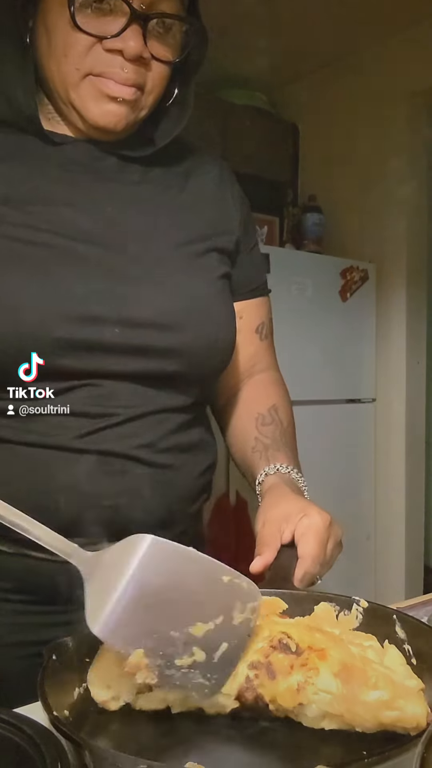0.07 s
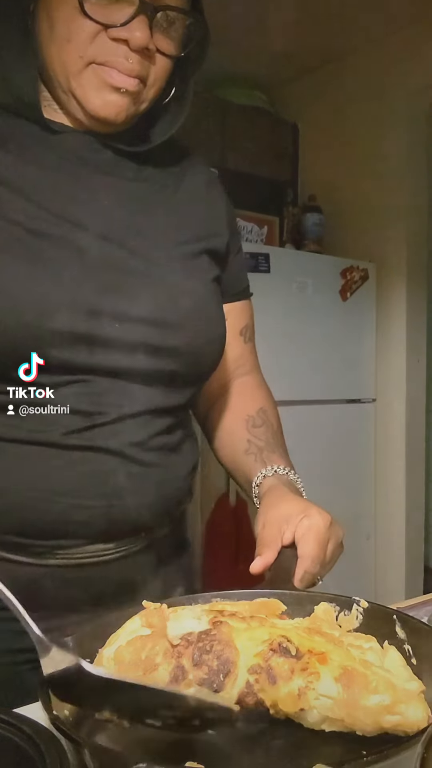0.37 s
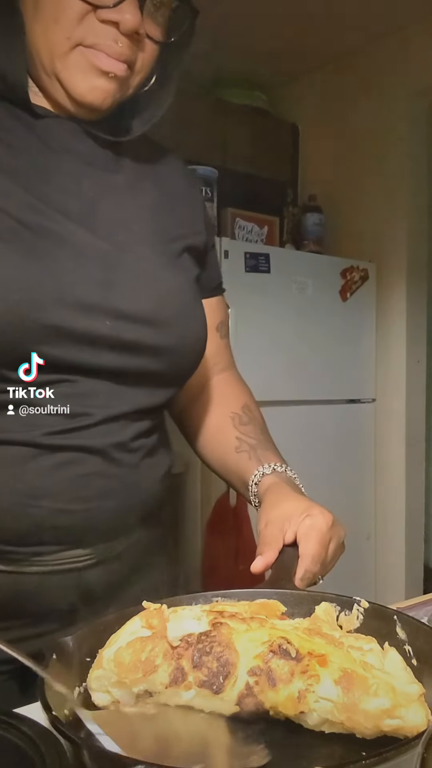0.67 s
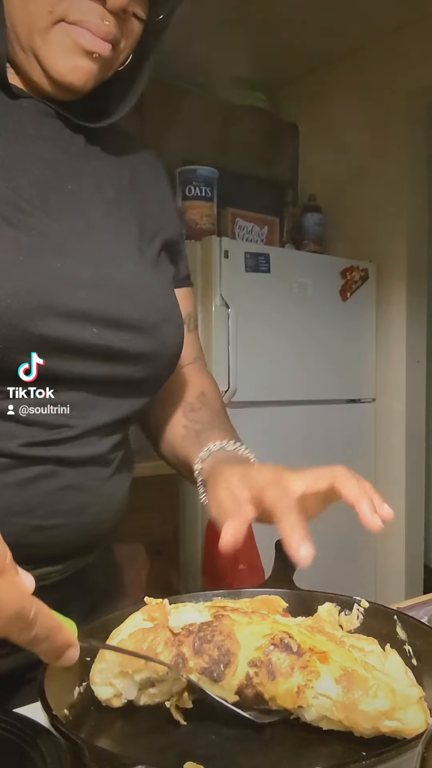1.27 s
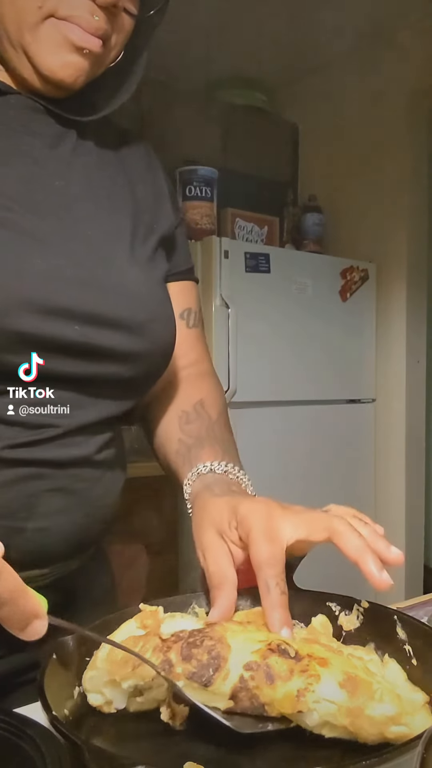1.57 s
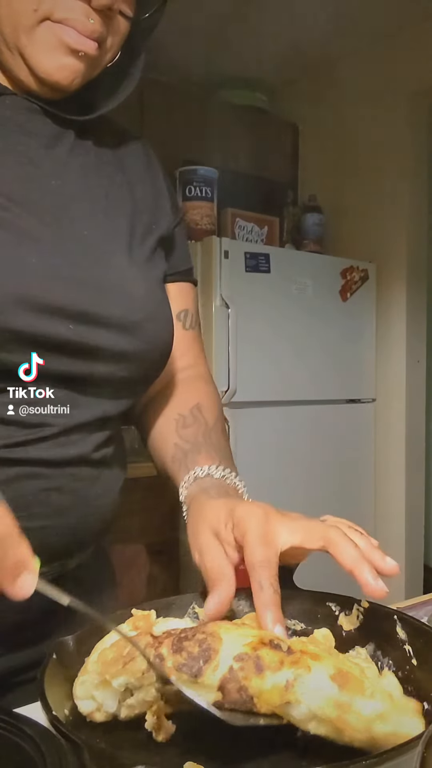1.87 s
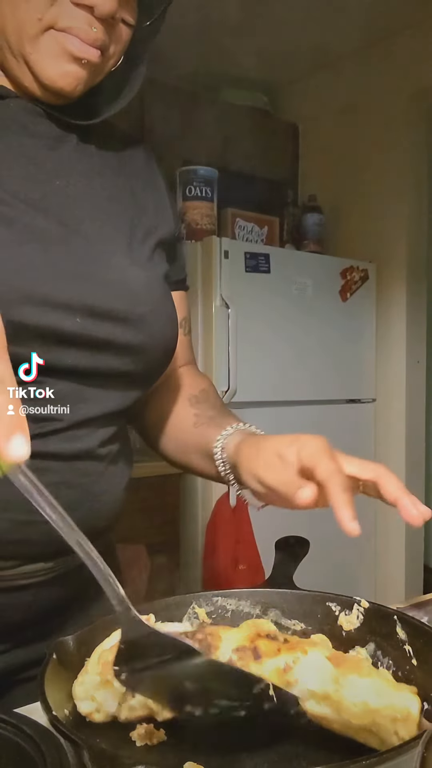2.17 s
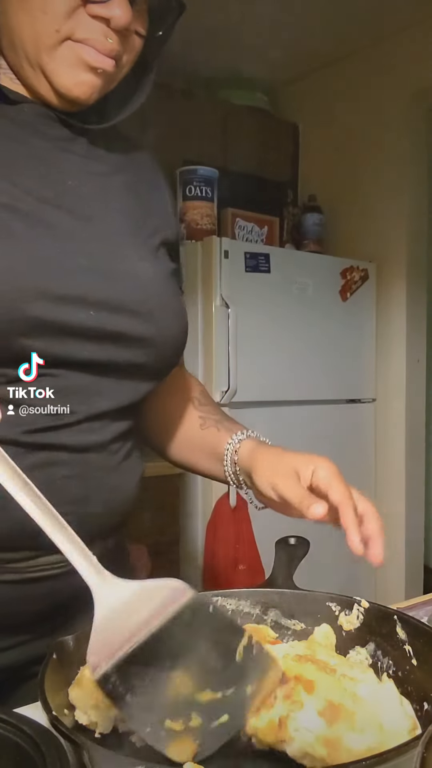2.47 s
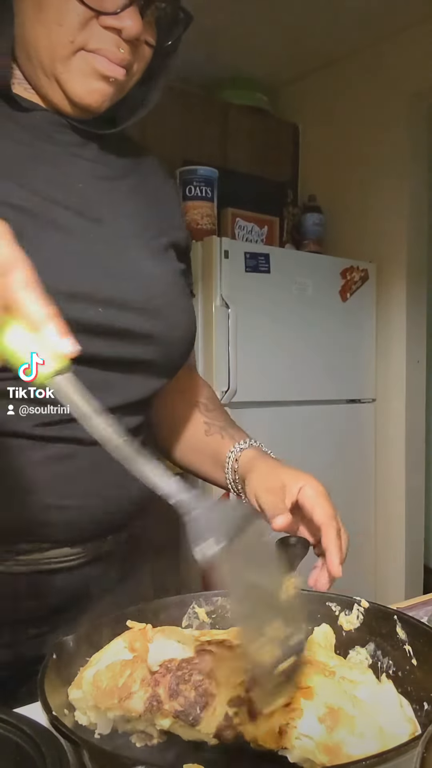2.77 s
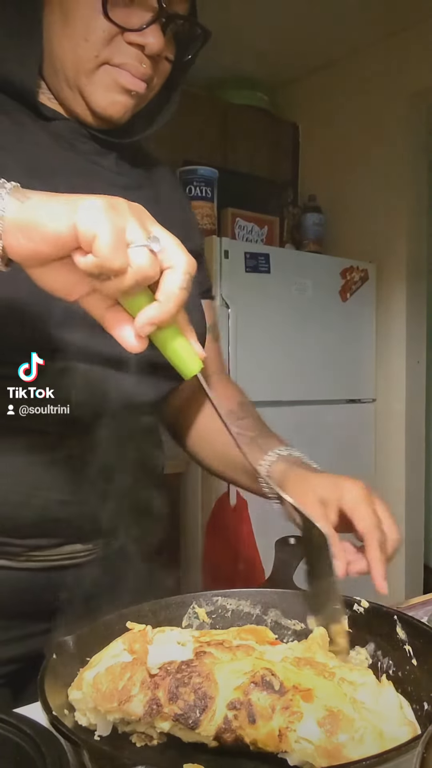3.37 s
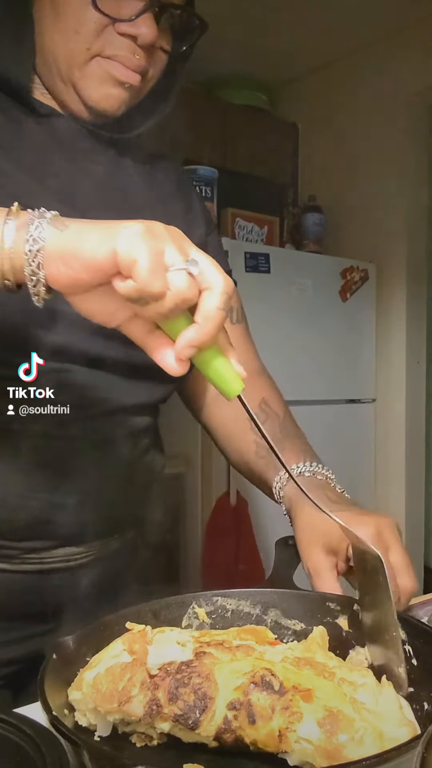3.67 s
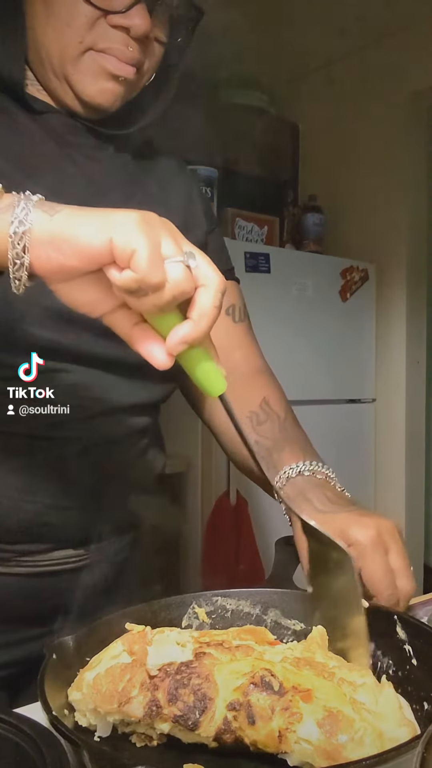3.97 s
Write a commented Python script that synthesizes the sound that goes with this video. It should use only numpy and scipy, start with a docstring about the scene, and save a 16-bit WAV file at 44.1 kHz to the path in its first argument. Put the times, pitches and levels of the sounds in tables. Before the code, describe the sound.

An omelette sizzles close by, with small spits of fat over a faint kitchen hum. A steel spatula knocks on the pan at about 0.4 seconds, then slides under the egg near 0.7 and 2 seconds with light taps, the hiss swelling each time. At 3.1 seconds it clanks and scrapes along the rim, ringing briefly, and it strikes the pan again near 3.9 seconds.

```python
"""An omelette sizzles in a frying pan, close by: steam bubbles burst in the fat, larger pockets spit.
A small kitchen rumbles and hums underneath. A steel spatula knocks on the pan, slides under the egg
twice (the fat hisses up), then clanks and scrapes along the rim with its blade ringing freely.
Each contact is stick-slip noise through the pan's resonances plus the ringing modes of the steel."""
import sys
import numpy as np
from scipy import signal
from scipy.fft import rfft, irfft
from scipy.io import wavfile
from scipy.ndimage import uniform_filter1d

SR = 44100
rng = np.random.default_rng(int(sys.argv[2]) if len(sys.argv) > 2 else 0)


def to_wav(sig):
    """Store sig (one row per channel, or 1-D mono) as 16-bit WAV at the path in sys.argv[1].

    Samples outside -1..1 are clipped; the rate is SR.
    """
    pcm = np.clip(np.atleast_2d(sig), -1, 1) * 32767
    pcm = np.round(pcm).astype(np.int16)
    wavfile.write(sys.argv[1], SR, pcm.T)  # frames by channels


N = 176400

# frying loudness: t/s, level/dB
SIZZLE_LEVEL = [(0, -67), (.25, -68), (.68, -64), (.8, -54), (.95, -53.5), (1.08, -55), (1.25, -59.5),
                (1.4, -66), (1.55, -62.5), (1.75, -58), (1.9, -60), (2.0, -62.5), (2.1, -55), (2.45, -53),
                (2.8, -55), (3.1, -58), (3.65, -61), (4, -65)]
# frying spectrum: f/Hz, relative level/dB
SIZZLE_SPECTRUM = [(250, -22), (600, -18), (950, -2.5), (1300, -13.5), (1900, -1), (3000, -0.5), (4300, 2),
                   (6300, 1.5), (8000, -3), (12000, -3.5), (15500, -6.5)]
# appliance rumble: f/Hz, relative level/dB
RUMBLE_SPECTRUM = [(20, -27), (42, -33.5), (56, -4), (85, -17), (115, -4), (150, -6), (195, 1), (260, -8),
                   (370, -7.5), (520, -16.5), (700, -20), (1000, -20.5), (1400, -27.5), (6000, -50.5)]
# mains hum: f/Hz, level/dB
HUM_LINES = [(59.5, -71.5), (119, -78), (238, -65.5)]
# spits of fat: t/s, gain/dB, centre f/Hz, hold/s
SPIT_EVENTS = [(0.259, -58, 7000, .004), (0.319, -62, 5870, 0.0045), (0.508, -61, 4600, 0.0053),
               (1.275, -60, 7000, .005), (1.304, -56, 5760, 0.0078), (1.582, -47.5, 11900, 0.0034),
               (2.325, -69, 3480, .006), (2.663, -57, 6000, .006), (2.847, -58, 6000, .008),
               (2.898, -53, 4460, 0.011), (2.924, -48.5, 4840, 0.017), (3.035, -59.5, 5500, .004),
               (3.477, -59, 5970, 0.0043), (3.531, -43, 4600, 0.0037), (3.547, -49, 5660, 0.0059),
               (3.661, -52, 4800, 0.0043), (3.736, -51.5, 6460, .005), (3.762, -52, 3960, 0.0026),
               (3.809, -52.5, 3600, 0.0068)]
# edge on rim, tip into base, flat on base, edge along rim, flat under egg
CONTACT_KINDS = ("clank", "jab", "slap", "scrape", "slide")
CONTACT_BANDS_HZ = (220, 700, 3200, 12000)
# spatula blows: kind, t/s, rise/s, hold/s, t60/s, gain/dB at each of CONTACT_BANDS_HZ,
# ring gain/dB, share of free ring time, left-right/dB
SPATULA_BLOWS = [("slap", .404, .004, 0.01, 0.21, -42.5, -37.5, -49.5, -71, 3.2, 0.37, 3.5),
                 ("slap", .504, 0.0037, .008, .1, -53, -50, -56.5, -66, -8, .4, 4),
                 ("slide", .746, 0.0092, 0.0079, 0.11, -54, -54.5, -64.5, -72, 3, 0.26, 2),
                 ("slap", 1.046, .008, 0.0089, 0.072, -56, -53, -57, -51, -12, 0.27, 1),
                 ("slap", 1.135, 0.0061, 0.0079, 0.092, -46, -47, -59, -66, -13.5, 0.22, 1),
                 ("slap", 1.226, .004, 0.0073, 0.31, -61, -52.5, -56, -74, -9.5, 0.43, 1),
                 ("slap", 1.855, 0.0022, 0.016, .07, -37, -47, -61.5, -57, -16, 0.38, 1),
                 ("clank", 3.105, 0.0069, 0.0029, 0.19, -33, -37, -27.5, -31, 2.3, 0.6, 4.2),
                 ("jab", 3.867, 0.01, 0.0092, 0.19, -31, -32.5, -22.5, -34, -5.5, 0.49, -1.1)]
# spatula drags: columns as SPATULA_BLOWS
SPATULA_DRAGS = [("slide", 0.441, 0.018, .04, 0.14, -36.5, -41.5, -55.5, -66.5, -11, 0.34, 3.2),
                 ("slide", 0.656, 0.091, .14, 0.45, -51, -47, -60.5, -63, -5, 0.73, 2.2),
                 ("scrape", 1.46, 0.034, .01, .12, -33, -54, -47.5, -58.5, -21, .3, 6),
                 ("slide", 1.963, 0.093, 0.23, 0.49, -46, -44.5, -58, -70, -7.5, 0.72, 1.1),
                 ("slide", 2.15, 0.0964, 0.0051, 0.046, -49, -43.5, -51, -48.5, -5, 0.45, 4),
                 ("slide", 2.32, 0.036, 0.061, 0.17, -50, -50, -69, -67, -0.71, 0.81, 3.5),
                 ("scrape", 3.185, 0.055, 0.06, 0.22, -36, -42, -31.5, -44, 2, 1, 3.6),
                 ("scrape", 3.71, 0.013, 0.033, 0.24, -38.5, -61.5, -69.5, -79, -1.5, 0.59, 1),
                 ("jab", 3.89, 0.043, 0.084, 0.51, -33, -49, -41, -60, 0, 0.81, 0)]
# damped pan resonances: f/Hz, width/Hz, peak gain/dB
PAN_RESONANCES = [(530, 58, 9), (609, 70, 2), (937, 72, 8.5), (1046, 49, 12.5), (1540, 33, 6),
                  (1758, 39, 12), (1903, 35, 11.5), (2340, 16, 3), (2530, 89, 9), (2910, 83, 6.5),
                  (3390, 87, 5), (3800, 200, 3.5), (4186, 100, 7), (4570, 170, 10), (5240, 40, 7),
                  (6500, 280, 7)]
# ringing modes of blade and pan: f/Hz, gain/dB for each of CONTACT_KINDS,
# free t60/s, left-right/dB, left lead/rad
RING_MODES = [(146, -15, -13, -24, -20, -25, 0.97, 3, 0.37),
              (271.6, -11.5, -13, -14.5, -11, -22, .9, 8, -.1),
              (409.8, -14, -12, -2.5, -13.5, -25, 1.02, 7.5, -1.1),
              (524, -26, -2, -14, -41, 3.5, 0.37, 1.5, -0.47),
              (668, -32, -21.5, -20, -15, -18.5, 1.32, 6.5, 0.32),
              (1040, -4, -14, -9.5, -6, -5, .62, 12, 0.12),
              (1481, -11.5, -24, -8, -8, -18, 0.43, 12.5, -0.57),
              (1690, -19.5, -15, -13, 0, -18, 0.67, 14, -1.66),
              (1749, -7.5, -2.5, -12, -5, -8, 0.56, 0.5, 1),
              (1947, -21.5, -11.5, -22, -30, -10, 0.56, -2, 0.74),
              (2170, -37, -25.5, -19, -21, -23, 0.81, 23, 0.69),
              (2295, -31, -25, -8, -30, -31, 0.31, -2, -0.15),
              (2532, -17, -9.5, -10.5, -13, -28, 0.47, 10, -1.73),
              (2695, -10.5, -20, -22, -5, -20, 0.52, 1, -1.77),
              (3155, -12.5, -24, -11.5, -15.5, 0, 0.24, 9, 0.95),
              (3334, -12, -23, -20, -31, -25, 0.15, 8, -0.48),
              (3580, -24, -8.5, -29, -12.5, -20, 0.11, 12, -0.41),
              (4035, -19, -13, -34, -9.5, -16, 0.16, 6, 0.66),
              (4710, -10.5, -11, -22, -25, -20, 0.1, 10, 0),
              (6580, -17, -30, -19, -10.5, -13, 0.14, 9, 0.67)]

TOP_HZ = 15800
LN_1000 = np.log(1000)  # 60 dB
TIME_S = np.arange(N) / SR
SIDE_SIGN = np.array([[1], [-1]])


def amp(db):
    """Decibels to gain."""
    return 10 ** (np.asarray(db) / 20)


def unit_rms(x):
    """Scale to rms 1."""
    return x / np.sqrt(np.mean(x ** 2))


def spectrum_db(hz, points):
    """Interpolate (f/Hz, level/dB) points over log frequency."""
    points_hz, points_db = np.array(points, float).T
    return np.interp(np.log(hz + 1), np.log(points_hz), points_db)


def shape(x, gain, size=4096):
    """Minimum-phase filter with magnitude gain(f/Hz)."""
    cepstrum = irfft(np.log(gain(np.fft.rfftfreq(size, 1 / SR)) + 1e-7))
    cepstrum[1:size // 2] *= 2
    cepstrum[size // 2 + 1:] = 0
    impulse = irfft(np.exp(rfft(cepstrum)))
    return signal.oaconvolve(x, impulse[None], axes=-1)[:, :x.shape[1]]


def waver(rate_hz):
    """Smooth random motion, spread near 1."""
    step = int(SR / rate_hz)
    return uniform_filter1d(np.repeat(rng.standard_normal(N // step + 1), step), step)[:N]


def grains(per_s, spread_db, alike_below_hz=490):
    """Dense uneven stereo clicks: alike in the bass, unrelated in the treble."""
    fires = rng.random(N) < per_s / SR
    size = fires * amp(spread_db * np.minimum(rng.exponential(size=N), 5))
    mid, side = (unit_rms(size * rng.standard_normal((1, N))) for _ in range(2))
    coherence = lambda f: .9 / (1 + (f / alike_below_hz) ** 2)
    mid = shape(mid, lambda f: np.sqrt(1 + coherence(f)))
    side = shape(side, lambda f: np.sqrt(1 - coherence(f)))
    return (mid + side * SIDE_SIGN) / np.sqrt(2)


def balance(left_right_db):
    """Left and right gains."""
    return amp(SIDE_SIGN * left_right_db / 2)


def envelope(start_s, rise_s, hold_s, t60_s):
    """Quadratic rise, hold, exponential release."""
    age_s = TIME_S - start_s
    release_s = np.maximum(age_s - rise_s - hold_s, 0)
    return np.clip(age_s / rise_s, 0, 1) ** 2 * np.exp(-LN_1000 * release_s / t60_s)


def room(x, wet_db, low_t60_s=0.43, treble_t60_s=0.11):
    """Add reflections off hob and walls; treble dies first."""
    t = np.arange(SR // 2) / SR
    noise = rng.standard_normal((2, len(t)))
    low = signal.sosfilt(signal.butter(2, 3000, fs=SR, output="sos"), noise)
    tail = low * np.exp(-LN_1000 * t / low_t60_s) + (noise - low) * np.exp(-LN_1000 * t / treble_t60_s)
    return x + amp(wet_db) * signal.fftconvolve(x, unit_rms(tail) / np.sqrt(len(t)), axes=-1)[:, :N]


def sizzle():
    """Tiny steam bubbles burst in the fat, louder where wet egg meets hot metal."""
    bubbles = grains(per_s=7000, spread_db=2.5)
    hiss = shape(bubbles, lambda f: amp(spectrum_db(f, SIZZLE_SPECTRUM)))
    hiss = unit_rms(room(hiss, wet_db=1.5))
    level_db = np.interp(TIME_S, *np.array(SIZZLE_LEVEL).T) + 1.1 * waver(rate_hz=24.5)
    return hiss * amp(level_db) * balance(2.1)


def appliances(rumble_db=-61.5, side_db=-10):
    """Low rumble and mains hum of the kitchen's appliances."""
    noise = rng.standard_normal((2, N))
    mid, side = unit_rms(shape(noise, lambda f: amp(spectrum_db(f, RUMBLE_SPECTRUM))))
    out = amp(rumble_db) * (mid + amp(side_db) * side * SIDE_SIGN)
    for hz, db in HUM_LINES:
        phase_rad = 2 * np.pi * (hz * TIME_S + rng.random()) + 0.37 * waver(rate_hz=5.6)
        out += amp(db) * np.sqrt(2) * np.sin(phase_rad)
    return out


def spits(half_width_oct=0.87):
    """Larger steam pockets burst in short sprays."""
    out = np.zeros((2, N))
    spray = grains(per_s=14000, spread_db=1.3)
    for start_s, db, centre_hz, hold_s in SPIT_EVENTS:
        burst = spray * envelope(start_s, rise_s=0.00078, hold_s=hold_s, t60_s=0.018)
        band = lambda f: 1.62 / np.sqrt(1 + (np.log2((f + 1) / centre_hz) / half_width_oct) ** 4)
        out += amp(db) * shape(burst, band)
    return room(out, wet_db=-4) * balance(2.0)


def pan_body(hz, overtones=56, from_hz=2600, overtone_db=10, low_cut_hz=125, high_cut_hz=12900):
    """Pan gain: damped resonances times the thin steel's crowd of narrow overtones."""
    peak = lambda centre_hz, width_hz: 1 / (1 + ((hz - centre_hz) / (width_hz / 2)) ** 2)
    broad = 0.53 + sum(amp(db) ** 2 * peak(f, width_hz) for f, width_hz, db in PAN_RESONANCES)
    offsets, strengths = rng.random(size=(overtones, 2)).T
    overtones_hz = from_hz + (np.arange(overtones) + offsets) / overtones * (TOP_HZ - from_hz)
    crowd = sum(2 * strength * peak(f, width_hz=45) for f, strength in zip(overtones_hz, strengths))
    fine = 1 + amp(overtone_db) ** 2 * crowd
    fine = np.where(hz > from_hz, fine / np.mean(fine[(hz > from_hz) & (hz < TOP_HZ)]), 1)
    rolloff = (1 + (low_cut_hz / (hz + 1)) ** 8) * (1 + (hz / high_cut_hz) ** 16)
    return np.sqrt(broad * fine / rolloff)


def spatula_friction(contacts, flutter_db=2.5):
    """Steel sticks and slips in fine grains, coloured by the pan."""
    slips = grains(per_s=12000, spread_db=1.9)
    friction = unit_rms(slips * amp(flutter_db * waver(rate_hz=110)))
    chatter = np.zeros((2, N))
    for _, start_s, rise_s, hold_s, t60_s, *bands_db, _, _, left_right_db in contacts:
        force = envelope(start_s, rise_s, hold_s, t60_s)
        colour = list(zip(CONTACT_BANDS_HZ, bands_db))
        chatter += balance(left_right_db) * shape(friction * force, lambda f: amp(spectrum_db(f, colour)))
    return room(shape(chatter, pan_body, size=16384), wet_db=-11.5)


def steel_ring(contacts, waver_depth=0.41):
    """Contacts feed energy to the modes of blade and pan; damping by the egg shortens the ring."""
    energies = np.zeros((len(RING_MODES), N))
    for kind, start_s, rise_s, hold_s, t60_s, *bands_db, ring_db, free_share, _ in contacts:
        force = envelope(start_s, rise_s, hold_s, t60_s)
        feed = force ** 4 / np.sum(force ** 4) + 1e-18
        colour = list(zip(CONTACT_BANDS_HZ, bands_db))
        for energy, (hz, *kinds_db, free_t60_s, _, _) in zip(energies, RING_MODES):
            retained = np.exp(-2 * LN_1000 / (free_t60_s * free_share * SR))
            drive_db = ring_db + kinds_db[CONTACT_KINDS.index(kind)] + spectrum_db(hz, colour)
            energy += signal.lfilter([1], [1, -retained], feed) * amp(drive_db) ** 2
    out = np.zeros((2, N))
    for energy, (hz, *_, left_right_db, lead_rad) in zip(energies, RING_MODES):
        phase_rad = 2 * np.pi * (hz * TIME_S + rng.random()) + waver_depth * waver(rate_hz=70)
        amplitude = np.sqrt(2 * energy) * (1 + waver_depth * waver(rate_hz=50))
        out += amplitude * balance(left_right_db) * np.sin([phase_rad + lead_rad, phase_rad])
    return out


def scene():
    """Frying and spatula over the appliances."""
    contacts = SPATULA_BLOWS + SPATULA_DRAGS
    return sizzle() + spits() + spatula_friction(contacts) + steel_ring(contacts) + appliances()


def record(dry):
    """Steep low-pass at TOP_HZ."""
    return signal.sosfilt(signal.ellip(10, .2, 80, TOP_HZ, fs=SR, output="sos"), dry)


dry = scene()
out = record(dry)
to_wav(out)
```